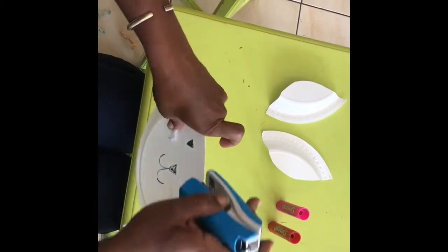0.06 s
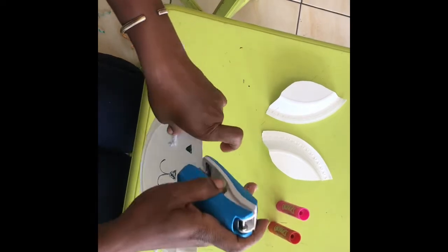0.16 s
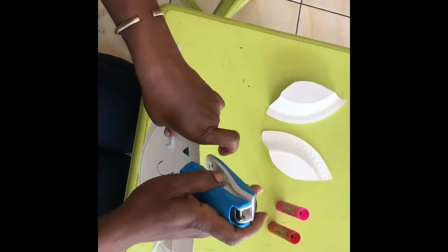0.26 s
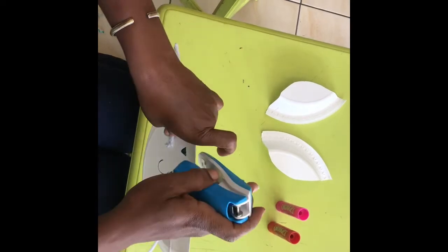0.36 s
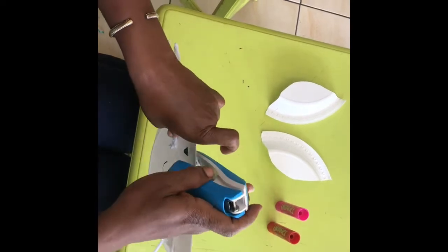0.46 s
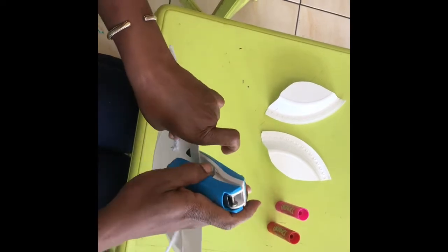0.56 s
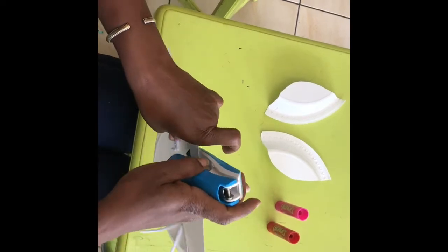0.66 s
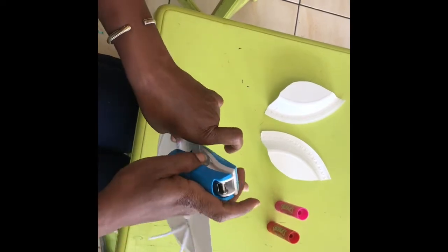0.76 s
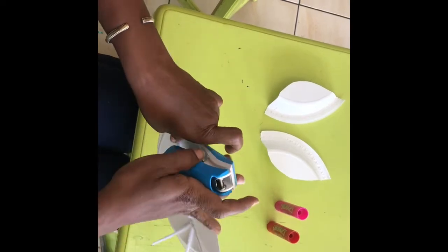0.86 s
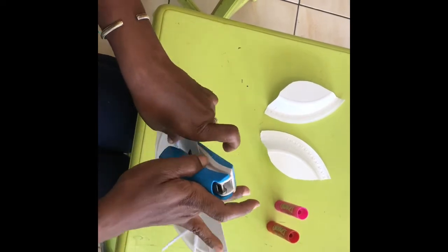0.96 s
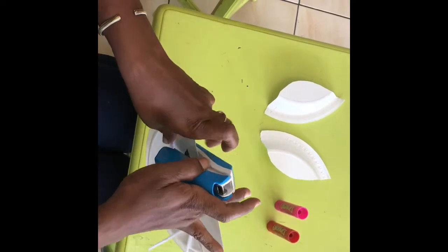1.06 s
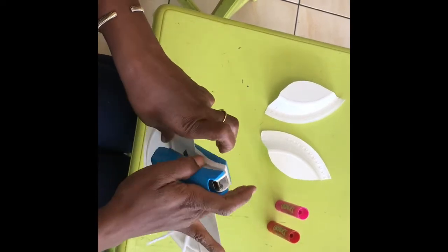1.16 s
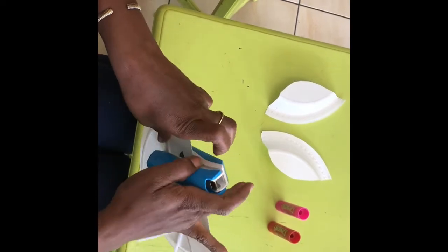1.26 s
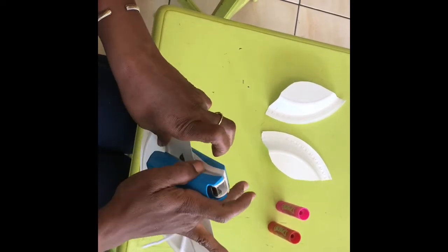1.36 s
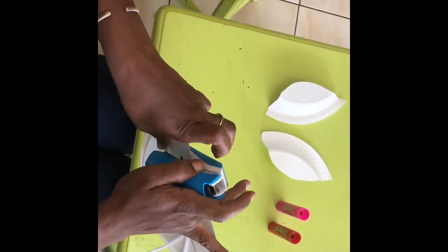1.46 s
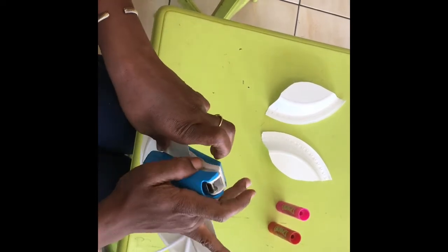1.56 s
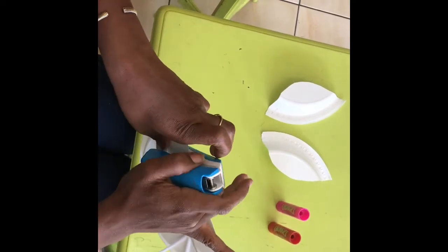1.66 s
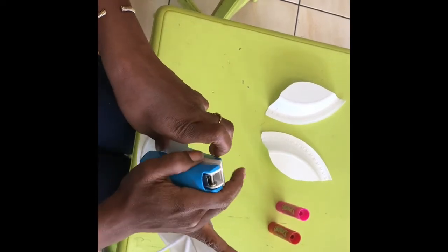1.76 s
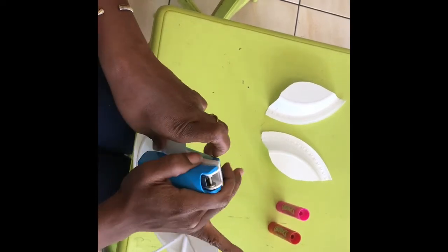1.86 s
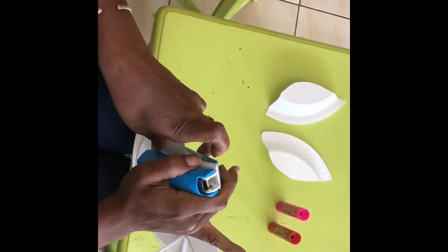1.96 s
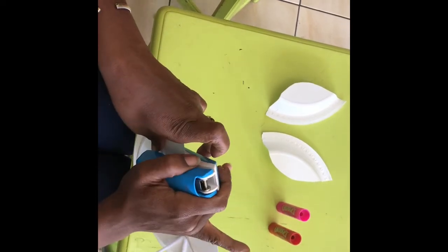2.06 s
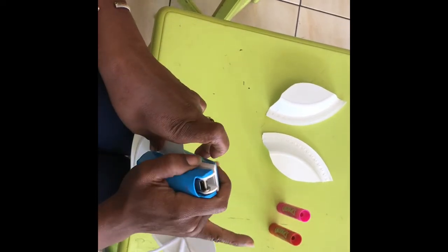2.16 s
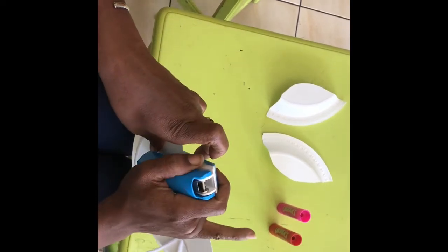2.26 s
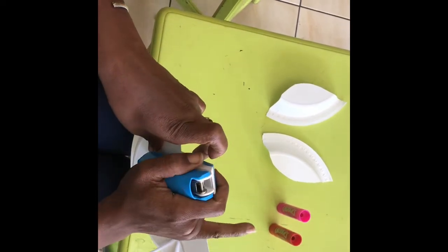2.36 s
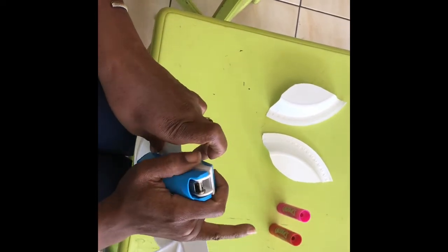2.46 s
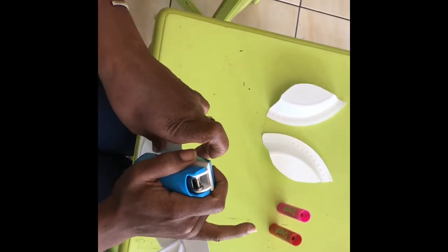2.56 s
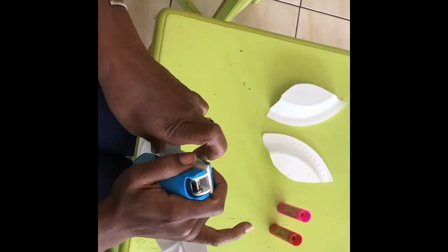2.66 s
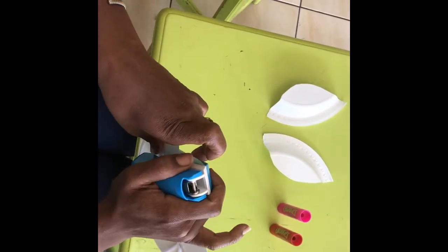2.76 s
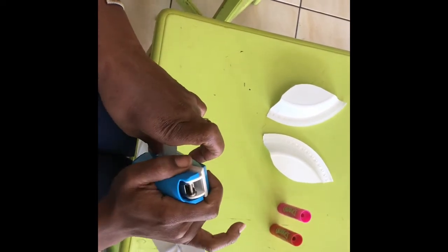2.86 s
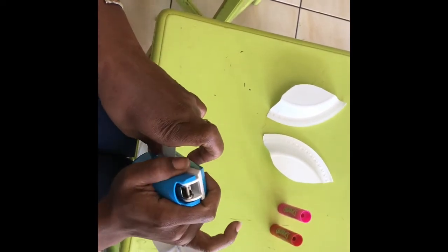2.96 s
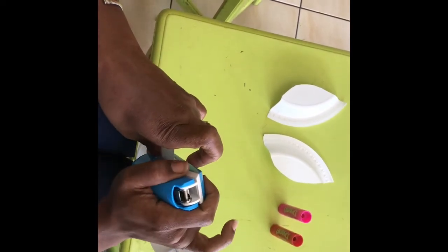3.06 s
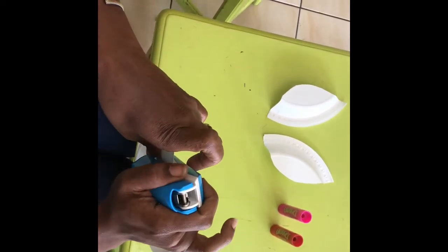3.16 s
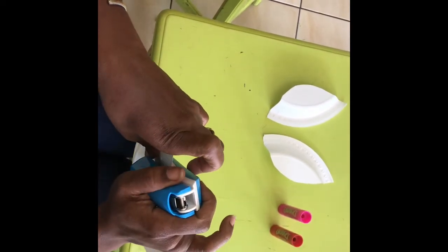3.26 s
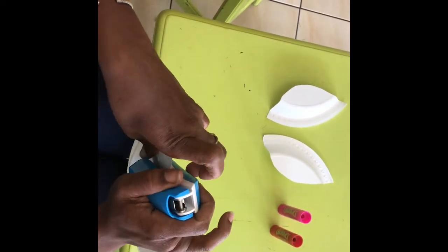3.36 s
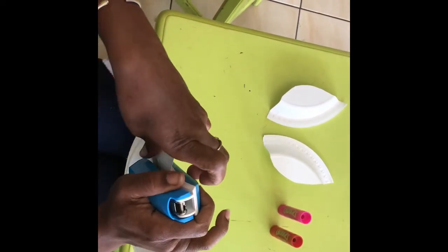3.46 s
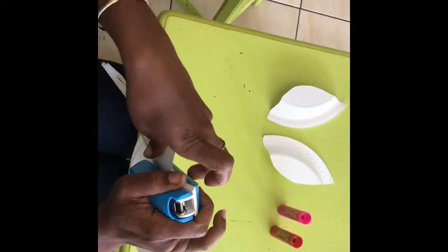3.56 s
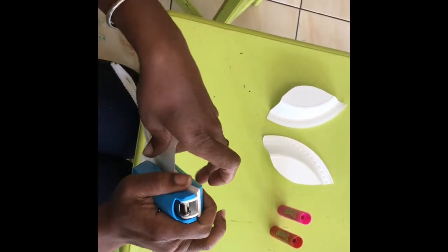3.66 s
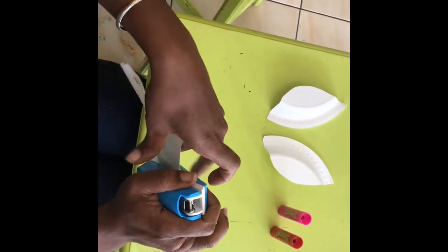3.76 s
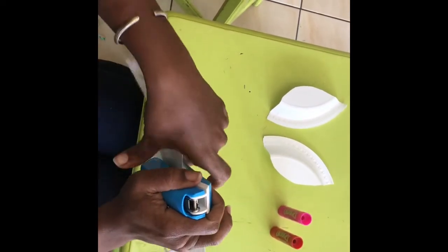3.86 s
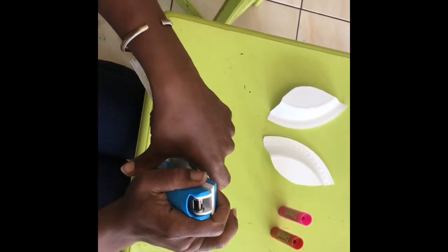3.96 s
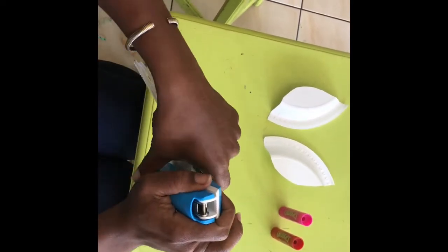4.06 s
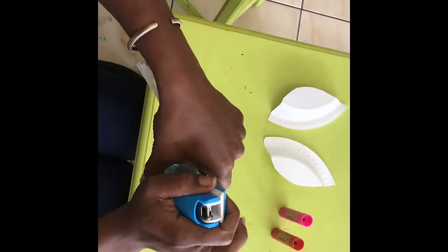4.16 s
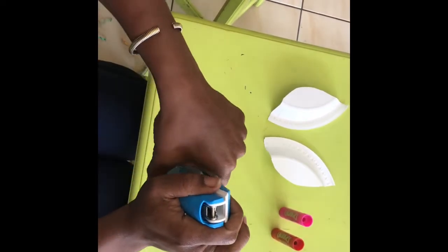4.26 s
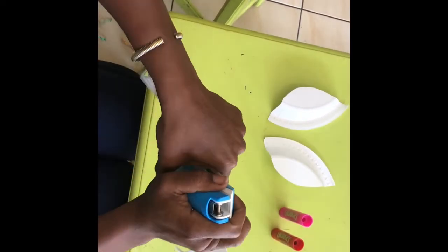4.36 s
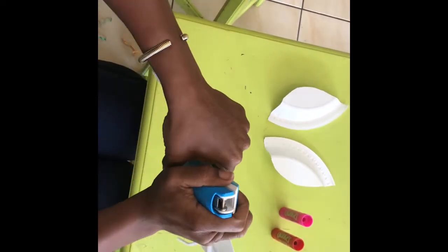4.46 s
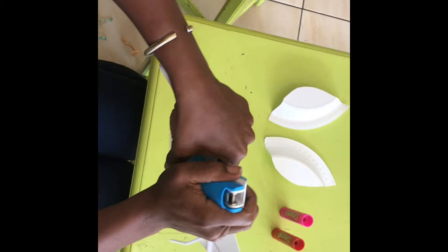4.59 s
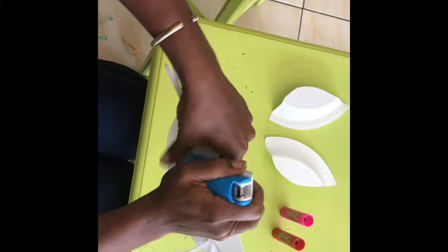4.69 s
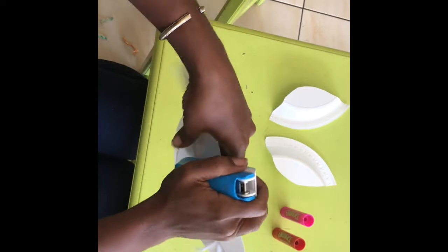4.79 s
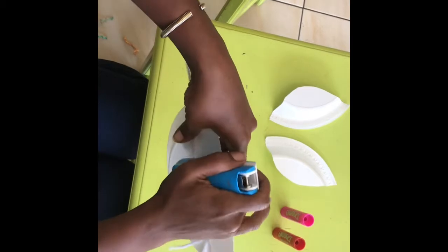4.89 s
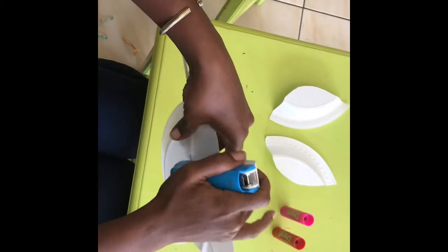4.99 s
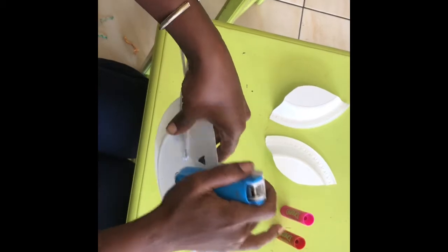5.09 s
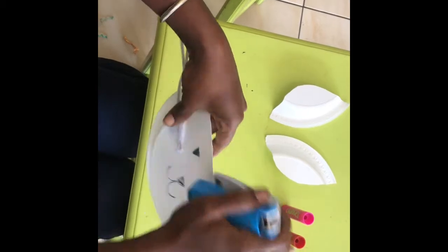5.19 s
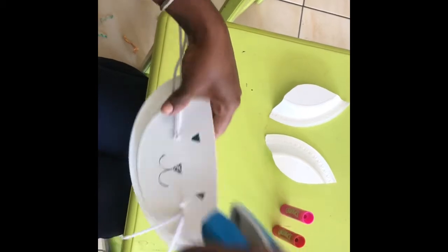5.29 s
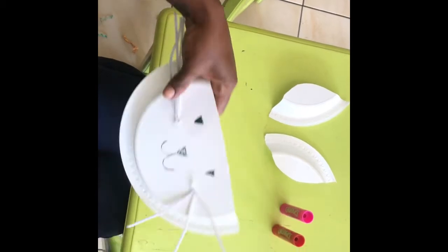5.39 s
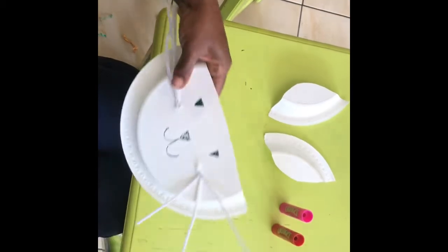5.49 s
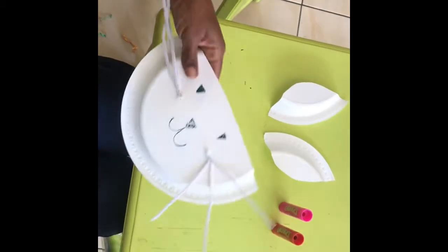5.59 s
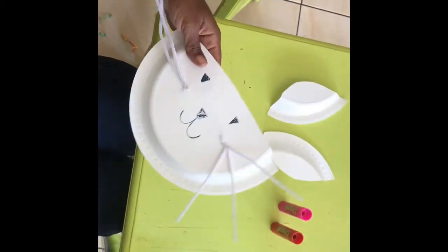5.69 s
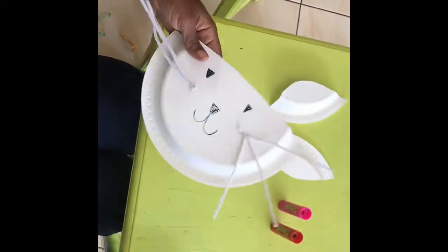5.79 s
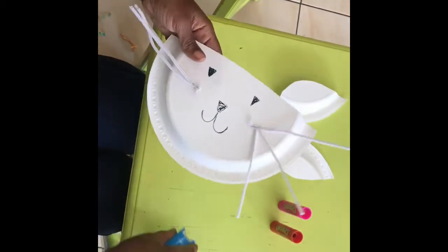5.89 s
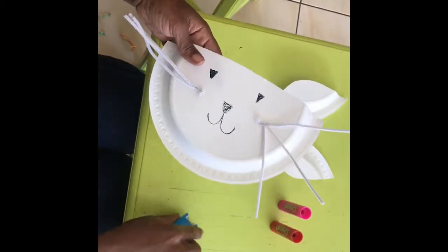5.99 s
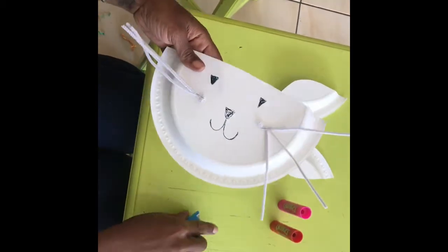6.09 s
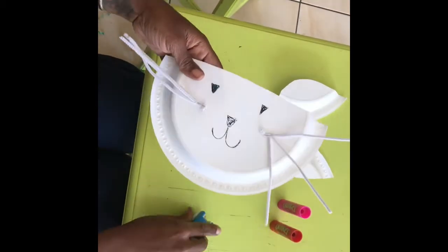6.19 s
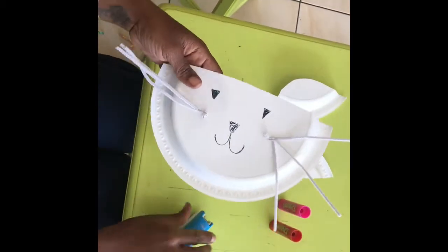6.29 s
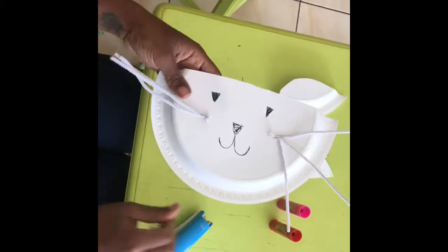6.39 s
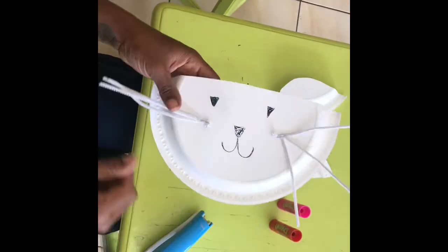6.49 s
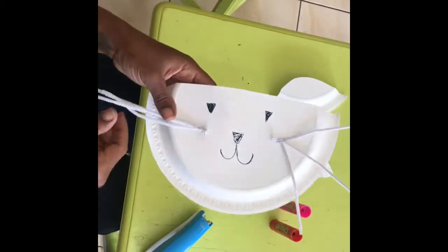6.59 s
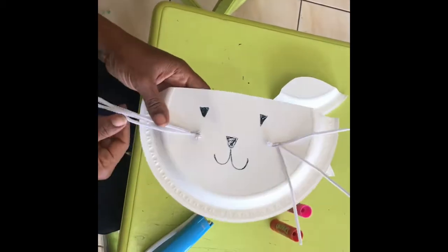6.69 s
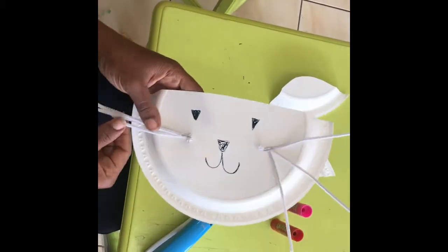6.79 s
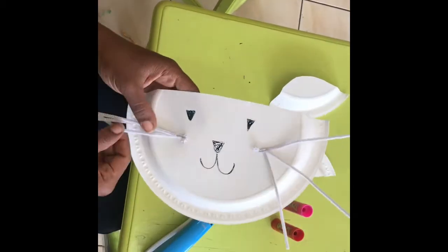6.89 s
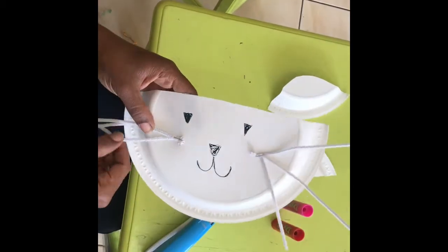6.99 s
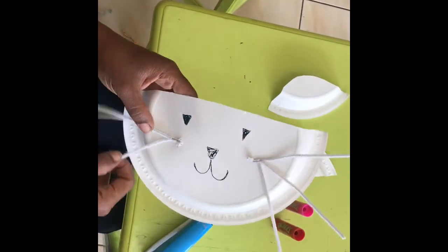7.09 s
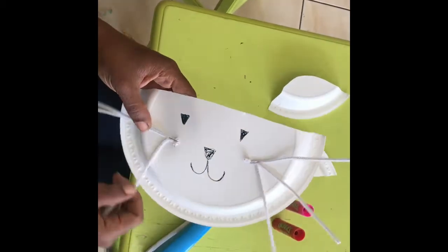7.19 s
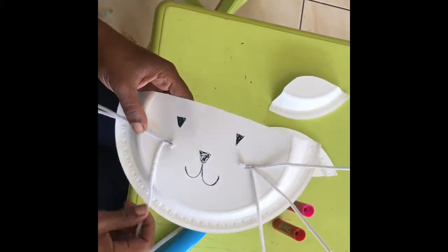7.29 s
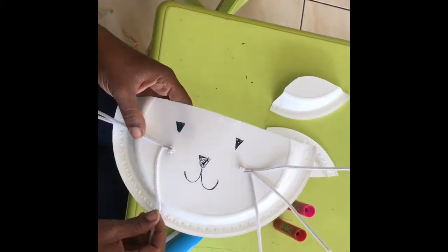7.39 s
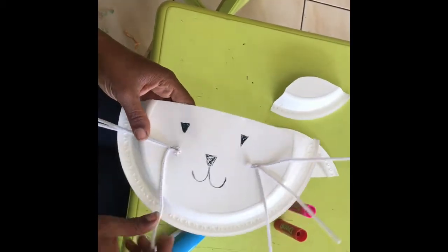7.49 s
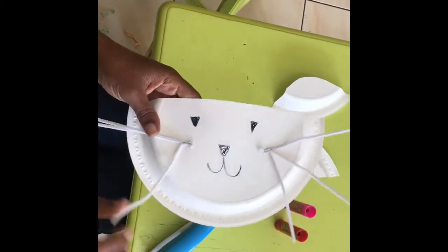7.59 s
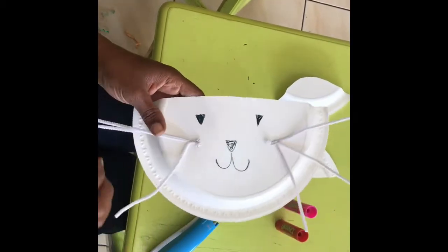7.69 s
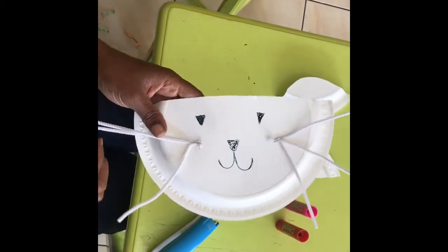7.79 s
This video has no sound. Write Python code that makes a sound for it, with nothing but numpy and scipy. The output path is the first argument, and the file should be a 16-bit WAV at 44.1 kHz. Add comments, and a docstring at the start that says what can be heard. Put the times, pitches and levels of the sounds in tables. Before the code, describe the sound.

Close up in a small tiled room, a stapler gives one bright click, then faint metal ticks and dry rubbing of fingers on paper. After more clacks and plastic knocks, two very loud snaps come in quick succession. It releases with a click, paper shifts, and the tool lands with hollow table thuds, ending in quiet rustles.

```python
"""A hand stapler is fitted over a paper plate, squeezed until the staple snaps through, released and laid on a plastic table.
Its ticks and knocks are short noise rattles through resonances; a steel strip, shell, plate and table ring as fading sines.
Fingers and paper rub as grainy filtered noise, over room tone, wavering hum and swelling low rumble.
A tiled room answers with noise that fades at its own speed in each frequency band."""
import sys
import numpy as np
from scipy import signal
from scipy.fft import rfft, irfft, next_fast_len
from scipy.io import wavfile
from scipy.ndimage import uniform_filter1d, map_coordinates

SR = 44100
rng = np.random.default_rng(int(sys.argv[2]) if len(sys.argv) > 2 else 0)


def how_loud(loudness_db):
    """Turn decibels into a plain amplitude multiplier (0 dB gives 1, 20 dB gives 10)."""
    steps = np.asarray(loudness_db, float) / 20
    return 10 ** steps


def put_to_file(sound):
    """Save the sound as 16-bit audio at rate SR, in the file named by the first command-line argument."""
    columns = np.atleast_2d(sound).T  # one column per channel
    safe = np.clip(columns, -1, 1)
    whole_steps = np.round(safe * 32767)
    wavfile.write(sys.argv[1], SR, whole_steps.astype(np.int16))


N = 345725  # length in samples

# In all tables, fade_s is the time to fall by 60 dB.

# room tone, relative shape: pitch_hz, level_db (per Hz)
AIR_SPECTRUM = [(41, -36.5), (70, -5), (108, -5.5), (145, -10.5), (205, -8), (380, -19), (586, -16),
                (808, -28), (2360, -31.5), (3330, -39), (6040, -39), (10200, -44), (13100, -42.5),
                (15400, -41.5), (16500, -58)]
AIR_DB = -57
# a far appliance hums: pitch_hz, peak_db, wavers_per_s
HUM_TONES = [(100.1, -53.5, 15), (201.5, -66, 9), (304.4, -68.5, 8), (581, -69, 29)]
# loudness of the far low rumble: time_s, level_db
RUMBLE_LEVEL = [(0, -57), (.45, -59), (.7, -48), (.85, -55), (1.05, -48), (1.37, -46), (1.48, -59),
                (1.62, -47), (1.81, -53), (1.9, -45), (2.05, -48), (2.31, -43), (2.53, -53), (3.1, -57),
                (3.9, -58), (4.08, -48), (4.37, -61), (5.3, -54), (7.84, -55)]
RUMBLE_WOBBLE_DB = 1.5
# rumble, relative shape: pitch_hz, level_db (per Hz)
RUMBLE_SPECTRUM = [(15, -42.5), (35, -15.5), (50, 1.5), (62, -5.5), (80, -10.5), (100, -37.5), (200, -89.5)]

# fingers, paper and string slide: start_s, length_s, scrape_db, fizz_db (relative to the scrape)
SLIDES = [(0, .03, -62, -9), (.735, .03, -55, -8), (.77, .02, -50.5, -8), (.8, .05, -55.5, -10),
          (.855, .015, -51, -4), (.9, .16, -60, -10), (1.13, .07, -61, -10), (1.225, .02, -46, -7),
          (1.26, .015, -47, -12), (1.29, .03, -57, -12), (1.825, .01, -55, -6), (2.55, .1, -62, -5),
          (2.86, .02, -63, -7), (3.01, .01, -65, -7), (3.37, .03, -65, -6), (3.58, .02, -62, -4),
          (3.64, .07, -54, -7), (3.82, .05, -45, -19), (3.9, .08, -60, -10), (4.755, .12, -52, -8),
          (5.06, .02, -62, -1), (5.19, .05, -60, -7), (5.27, .06, -58, -14), (5.55, .14, -62, -6),
          (5.74, .02, -58.5, -10), (6.075, .015, -50, 1), (6.39, .07, -65, -5), (6.8, .08, -62, -10),
          (6.91, .07, -58, -6), (7.05, .18, -65, -6), (7.26, .17, -60, -6.5), (7.53, .05, -62, -6)]
RISE_DB_PER_S, FALL_DB_PER_S = 450, 300  # how a slide starts and dies
# long faint rubbing of the grip, underneath the slides: start_s, length_s, scrape_db
GRIP_SPELLS = [(.3, 1.1, -68), (1.45, .95, -69.5), (2.7, .6, -77), (3.35, 2.5, -68), (6.2, 1.6, -69)]
GRIP_FIZZ_DB, GRIP_WOBBLE_DB = -10, 2.5  # fizz is relative to the scrape
# dull part of the rubbing, relative shape: pitch_hz, level_db (per Hz)
SCRAPE_SPECTRUM = [(470, -43.5), (800, -8.5), (1290, -5.5), (1500, -8), (2320, -4), (3580, -7), (4710, -6),
                   (6380, -4.5), (9000, -17), (11700, -38), (19800, -120)]
# fine part of the rubbing, relative shape: pitch_hz, level_db (per Hz)
FIZZ_SPECTRUM = [(4410, -24.5), (7500, -9), (10200, -0.5), (14900, -0.5), (16200, -12), (16500, -39.5)]
# colour the plate gives to the scrape: pitch_hz, width_hz (centre to 1/e of the boost), boost_db
PAPER_COLOUR = [(1950, 93, 3.5), (2350, 200, 3.5), (2900, 150, 3), (4260, 300, 1), (6100, 600, 1)]

# steel parts tick and snap: start_s, shell_db (before a shared lift),
# arm_db and edge_db (both relative to the shell), fade_s
STEEL_CLICKS = [(.2042, -23.5, 7, -2.5, .014), (.2719, -40, 1, -13, .014), (.302, -39, -4, -4.5, .03),
                (.406, -48, -.5, -12, .039), (.4616, -48, 4, 14, .021), (.466, -50.5, 4.5, 3, .03),
                (.5127, -49.5, 4.5, 8.5, .029), (.9582, -54.5, 1.5, -3, .044), (1.1452, -50.5, 2, -4, .035),
                (1.161, -56, 7, -4, .027), (1.217, -48, 6.5, 2, .07), (1.231, -48.5, 10, 3, .029),
                (1.735, -62, 1, 0, .05), (2.1003, -56, 12.5, -12, .009), (2.1596, -54, 1, -6, .033),
                (2.284, -64, 11, -3, .046), (2.36, -63, 1, 0, .04), (2.5257, -61.5, 8, 6, .021),
                (2.5589, -53, -2, -5, .056), (2.592, -58, 8, 8, .03), (2.5968, -41, 10, 9.5, .022),
                (2.6958, -56.5, 10.5, 7, .018), (2.999, -59, 6.5, -3, .041), (3.027, -64, 8, -1, .05),
                (3.401, -48, 1, -11, .025), (3.6215, -32, -1, -5, .038), (3.705, -56, -8, -3, .038),
                (3.735, -60, -4, 2, .03), (3.811, -31, -6, -2, .024), (3.835, -29, -5, -2.5, .046),
                (3.839, -33, -6, 2, .012), (4.2597, -64, 3, 0, .039), (4.2827, -19, 4, -5, .021),
                (4.2837, -12, 5, 2.5, .016), (4.2905, -36, -4, 0, .053), (4.3791, -23, 10.5, 1.5, .02),
                (4.3832, -16, 6, -3, .017), (4.389, -32.5, -15, 6, .076), (4.566, -66, 3, 16, .025),
                (4.633, -62.5, 5, 2, .065), (4.656, -63, 8, 3, .03), (4.7384, -49.5, 3, -3, .025),
                (4.766, -45.5, 4, -5, .018), (4.775, -51.5, 12, 12.5, .039), (4.806, -55.5, 13, 17, .049),
                (4.8225, -26, 5.5, 5, .017), (4.833, -39, -4, 4, .027), (4.9038, -54, 11, 15.5, .048),
                (4.916, -50, 10, 0, .024), (5.206, -57, 6, -5, .03), (5.217, -53, 10.5, -2, .02),
                (5.245, -52, 2, -5, .06), (5.2577, -30.5, 9, -12, .013), (5.1102, -62, 6, -8, .04),
                (5.8183, -53, 3, 4, .036), (6.056, -40, 0, -1, .055), (6.079, -50.5, 8.5, 10, .037),
                (6.194, -46.5, 0, 5, .031), (6.205, -52, 3, 5.5, .043)]
CLICK_PLATE_DB = -8  # relative to the shell: a steel click shakes the plate only weakly
# duller knocks of plastic on paper or table: start_s, shell_db (before a shared lift),
# plate_db (relative to the shell), fade_s
DULL_KNOCKS = [(.2056, -35, -6.5, .051), (.4258, -49.5, -6, .078), (2.206, -54, 0, .03),
               (2.211, -37.5, .5, .019), (2.223, -58, 5, .045), (3.033, -59, 3.5, .029),
               (3.118, -55, -1, .02), (3.1967, -59, -4, .024), (3.3927, -43, .5, .054),
               (3.635, -42.5, -3, .065), (3.7886, -35, 9, .067), (3.795, -29.5, -2.5, .062),
               (3.827, -37, -6, .079), (4.877, -46.5, -2, .043), (4.974, -58.5, 8.5, .039),
               (5.1102, -59.5, 5.5, .046), (5.251, -39, -12, .082), (5.388, -59, -1, .037),
               (5.629, -57, 5, .055), (6.0193, -49, -9, .033), (6.0419, -34, 0, .023),
               (6.049, -43, 4, .017), (6.172, -53, -8, .054), (6.177, -47, 2, .013),
               (7.12, -64.5, 8.5, .051), (7.494, -58, -9, .04), (7.5085, -45, -12, .03),
               (7.5135, -41, -12, .03)]
KNOCK_ARM_DB, KNOCK_EDGE_DB = -11, -16  # relative to the shell: a knock hardly reaches the steel
# The next four list pitch_hz, width_hz, level_db for one pass; the sound passes twice.
# plastic shell
SHELL_PEAKS = [(1760, 960, 0), (2480, 800, 6), (3420, 1800, 0)]
# paper plate
PLATE_PEAKS = [(520, 330, -1.5), (824, 320, 1), (1350, 730, 0.5)]
# steel arm and magazine
ARM_PEAKS = [(4167, 1930, -1), (6150, 920, 3), (7420, 1580, -1)]
# hard steel edges
EDGE_PEAKS = [(8720, 1300, 2.5), (12000, 2500, 3.5), (15300, 3100, 1.5)]

# contacts that ring the spring strip: start_s, level_db
STRIP_BLOWS = [(.4609, -54), (4.2875, -19.5), (4.387, -21.5), (4.775, -44), (4.807, -34), (4.834, -52),
               (4.9043, -45), (5.8192, -60), (6.056, -39), (6.079, -50), (6.194, -42)]
# spring strip: pitch_hz, level_db, fade_s
STRIP_TONES = [(6912, -6, .07), (11415, 0, .1), (11460, -15, .13), (14000, -16, .08)]
# the shell pings at a pitch set by the grip: start_s, level_db, pitch_hz
SHELL_PINGS = [(.2055, -24.5, 1890), (.515, -43, 1950), (2.212, -39.5, 2300), (3.622, -27, 2350),
               (3.797, -26.5, 1146), (3.84, -29, 1240), (4.824, -33, 2450), (5.259, -38, 4260),
               (5.63, -46, 590), (5.65, -46, 590), (6.043, -37, 1550), (4.2845, -20, 3600),
               (4.384, -21, 4040), (7.511, -43, 2436), (7.516, -45, 1900)]
# contacts that flex the whole plate: start_s, level_db
PLATE_BLOWS = [(0.272, -37), (1.231, -39), (2.21, -42), (3.791, -28.5), (3.796, -29.5), (3.837, -33),
               (4.283, -29), (4.382, -23), (4.822, -39), (5.63, -43), (6.295, -43), (6.33, -45)]
# flexing plate: pitch_hz, level_db, fade_s
PLATE_TONES = [(195, -9.5, 0.084), (247, -8.5, 0.19), (328, -11.5, 0.25), (378, -11.5, 0.12),
               (514, -9.5, .14), (583, -14, .1)]
# the stapler lands and rocks on the table: start_s, level_db
TABLE_BLOWS = [(6.022, -30), (6.04, -40), (6.057, -27), (6.101, -37.5), (6.184, -36.5), (6.196, -35.5),
               (6.293, -42.5), (6.312, -48), (6.357, -41.5)]
# table top: pitch_hz, level_db, fade_s
TABLE_TONES = [(147.5, -6.5, 0.25), (175, -3.5, 0.092), (206.4, -3.5, .14), (258, -5, 0.079),
               (445, -18.5, .1)]

# how long the room holds each pitch: pitch_hz, fade_s
ROOM_FADE = [(150, 0.56), (500, 0.63), (1500, 0.53), (4000, 0.46), (9000, .4), (16000, 0.26)]
# the room's share of the sound: pitch_hz, level_db
ROOM_SHARE = [(150, -4.5), (1000, -5), (4000, -11), (8000, -13.5), (11400, -14), (16000, -16.5)]
# a dip in the microphone's response: pitch_hz, width_hz (centre to 1/e of the dip), level_db
MICROPHONE_DIP = (10400, 330, -2.5)
TOP_HZ = 15950  # middle of the step down in the highest treble


def unit(x):
    """Scaled to rms 1."""
    return x / np.sqrt(np.mean(x ** 2) + 1e-20)


def along(points, hz):
    """Reads a curve of (Hz, value) points on a log pitch axis."""
    f, value = np.transpose(points)
    return np.interp(np.log(hz + 1), np.log(f + 1), value)


def wobble(rate):
    """A smooth random curve, rate knots a second."""
    knots = rng.standard_normal(int(N * rate / SR) + 4)
    return map_coordinates(knots, [np.arange(N) * rate / SR])


def filtered(x, response):
    """x through a filter given as a (complex) response at each frequency."""
    m = next_fast_len(N + 8192)
    return irfft(rfft(x, m) * response(np.fft.rfftfreq(m, 1 / SR)), m)[:N]


def coloured(x, spectrum):
    """x shaped by the given spectrum, rms 1."""
    return unit(filtered(x, lambda hz: how_loud(along(spectrum, hz))))


def bumps(hz, peaks):
    """Bell-shaped boosts or dips, summed in dB."""
    return sum(db * np.exp(-((hz - centre) / width) ** 2) for centre, width, db in peaks)


def resonant(x, peaks):
    """x twice through causal resonances, leaving the power of white noise unchanged."""
    def bank(f):
        total = 0
        for k, (centre, width, db) in enumerate(peaks):
            damping = 1j * f * width
            total = total + (-1) ** k * how_loud(db) * damping / (centre * centre - f * f + damping)
        return total ** 2
    return filtered(x, lambda f: bank(f) / np.sqrt(np.mean(abs(bank(f)) ** 2)))


def struck(blows, modes, attack):
    """Every blow starts the modes from rest, at new strengths; attack is the swell time in seconds."""
    t, out = np.arange(SR // 2) / SR, np.zeros(N + SR)
    swell = 1 - np.exp(-t / attack)
    for start, blow_db in blows:
        tones = np.zeros(len(t))
        for hz, db, fade in modes:
            fading = how_loud(db + 2 * rng.standard_normal() - 60 * t / fade)
            tones += fading * np.sin(2 * np.pi * hz * t)
        out[round(start * SR):][:len(t)] += how_loud(blow_db) * swell * tones
    return out[:N]


def background():
    """Room tone, an unsteady hum and a low rumble that swells."""
    air = how_loud(AIR_DB + .8 * wobble(3)) * coloured(rng.standard_normal(N), AIR_SPECTRUM)
    t, hum = np.arange(N) / SR, np.zeros(N)
    for hz, db, rate in HUM_TONES:
        level = how_loud(db + 1.5 * wobble(rate))
        hum += level * np.sin(2 * np.pi * hz * t + .5 * wobble(rate))
    rumble = coloured(rng.standard_normal(N), RUMBLE_SPECTRUM)
    times, levels = np.transpose(RUMBLE_LEVEL)
    rumble_db = np.interp(t, times, levels) + RUMBLE_WOBBLE_DB * wobble(8)
    return air + hum + how_loud(rumble_db) * rumble


def stroke(start, length, db):
    """Gain of one slide: a quick rise, a hold, a slower fall."""
    t = np.arange(N) / SR
    rise_db = RISE_DB_PER_S * np.clip(start - t, 0, .5)
    fall_db = FALL_DB_PER_S * np.clip(t - start - length, 0, .5)
    return how_loud(db - rise_db - fall_db)


def patchy(x, patchy_db):
    """x with random patches of gain over time and frequency."""
    z = signal.stft(x, nperseg=256)[2]
    field = uniform_filter1d(rng.standard_normal(z.shape), size=4, axis=0)  # smooth over frequency
    field = uniform_filter1d(field, size=12, axis=1)  # smooth over time
    return signal.istft(z * how_loud(patchy_db * unit(field)), nperseg=256)[1][:N]


def rubbing():
    """Sliding contact: clumped grains of friction, dull scrape and fine fizz."""
    grip = how_loud(GRIP_WOBBLE_DB * wobble(12)) * sum(stroke(*row) for row in GRIP_SPELLS)
    slide_power = np.array([stroke(s, length, db) for s, length, db, _ in SLIDES]) ** 2
    scrape_gain = np.sqrt(slide_power.sum(0) + grip ** 2)
    fizz_share = how_loud([row[3] for row in SLIDES]) ** 2
    fizz_gain = np.sqrt(fizz_share @ slide_power + (how_loud(GRIP_FIZZ_DB) * grip) ** 2)
    grains = how_loud(1.3 * wobble(60) + 2.2 * wobble(500))  # slow clumps and fast grains
    scrape = coloured(patchy(grains * rng.standard_normal(N), patchy_db=2.1), SCRAPE_SPECTRUM)
    scrape = unit(filtered(scrape, lambda hz: how_loud(bumps(hz, PAPER_COLOUR))))
    fizz = coloured(patchy(grains * rng.standard_normal(N), patchy_db=3.0), FIZZ_SPECTRUM)
    return scrape_gain * scrape + fizz_gain * fizz


def stapler():
    """Every contact is a short rattle that shakes shell, plate, arm and edges."""
    t, power = np.arange(SR // 5) / SR, np.zeros((4, N + SR))
    contacts = [(s, db, CLICK_PLATE_DB, arm, edge, fade) for s, db, arm, edge, fade in STEEL_CLICKS]
    contacts += [(s, db, plate_db, KNOCK_ARM_DB, KNOCK_EDGE_DB, fade) for s, db, plate_db, fade in DULL_KNOCKS]
    for start, db, plate_db, arm_db, edge_db, fade in contacts:
        onset = 1 - np.exp(-t / .0006)
        rattle = how_loud(db + 3.5 - 60 * t / fade) * onset  # 3.5 dB is the shared lift
        part_gains = how_loud([[0], [plate_db], [arm_db], [edge_db]])
        power[:, round(start * SR):][:, :len(t)] += (rattle * part_gains) ** 2
    chatter = how_loud(1.8 * wobble(1500))  # each contact is a cluster of tiny impacts
    shake = np.sqrt(power[:, :N]) * chatter * rng.standard_normal((4, N))
    parts = (SHELL_PEAKS, PLATE_PEAKS, ARM_PEAKS, EDGE_PEAKS)
    return sum(resonant(x, peaks) for x, peaks in zip(shake, parts))


def ring():
    """The spring strip sings on after the sharper contacts; the shell pings briefly."""
    pings = sum(struck([(s, db)], [(hz, 0, .05)], attack=0.00042) for s, db, hz in SHELL_PINGS)
    return struck(STRIP_BLOWS, STRIP_TONES, attack=0.004) + pings


def plate():
    """The firmer contacts flex the plate and make it drum."""
    return struck(PLATE_BLOWS, PLATE_TONES, attack=0.0011)


def table():
    """Soft blows set the hollow table top booming."""
    return struck(TABLE_BLOWS, TABLE_TONES, attack=.002)


def room(x):
    """Diffuse echo: the energy in each band lingers and dies at its own speed."""
    hz, t, z = signal.stft(x, SR, nperseg=256)
    keep = how_loud(-120 * t[1] / along(ROOM_FADE, hz))  # energy kept per step; 120 as energy is squared
    energy, held = np.zeros(z.shape), 0
    for k in range(2, len(t)):  # the echo starts two steps late
        held = keep * held + (1 - keep) * abs(z[:, k - 2]) ** 2
        energy[:, k] = held
    noise = signal.stft(rng.standard_normal(N), nperseg=256)[2]
    noise = noise / np.sqrt(np.mean(abs(noise) ** 2))
    echo = noise * np.sqrt(energy) * how_loud(along(ROOM_SHARE, hz))[:, None]
    return signal.istft(echo, nperseg=256)[1][:N]


def scene():
    """Near sources, their echo and the background; thumps and thin ringing stir the room less."""
    contacts = stapler() + plate() + rubbing()
    thumps, tones = table(), ring()
    echo = room(contacts + how_loud(-3) * tones + how_loud(-6) * thumps)
    return (contacts + tones + thumps + echo + background())[None]


def low_pass(x):
    """Removes everything above the highest recorded frequency."""
    return signal.sosfilt(signal.butter(12, 17020, fs=SR, output="sos"), x)


def record(dry):
    """The phone colours the sound and clips loud snaps softly; a separate step then dulls the top treble."""
    heard = filtered(dry[0], lambda hz: how_loud(bumps(hz, [MICROPHONE_DIP])))
    soft = heard / (1 + abs(heard) ** 6) ** (1 / 6)  # never passes full scale

    def treble_step(hz):
        """Slides from 0 to -16 dB around TOP_HZ."""
        return how_loud(-16 / (1 + np.exp(np.minimum((TOP_HZ - hz) / 60, 50))))
    mix = filtered(soft, treble_step)
    return low_pass(mix[None])


dry = scene()
out = record(dry)
put_to_file(out)
```